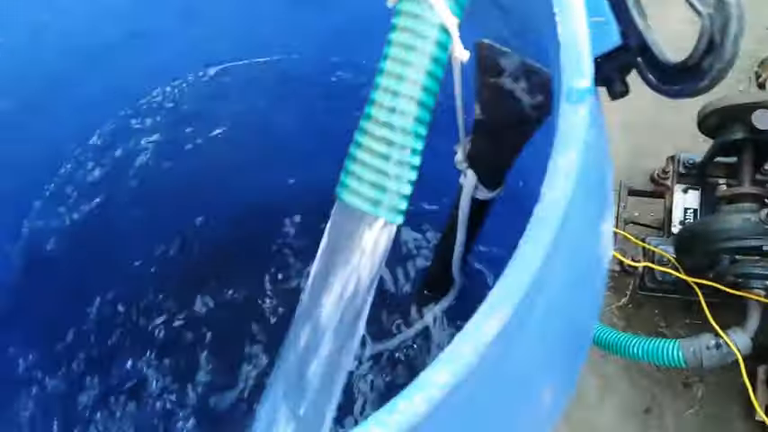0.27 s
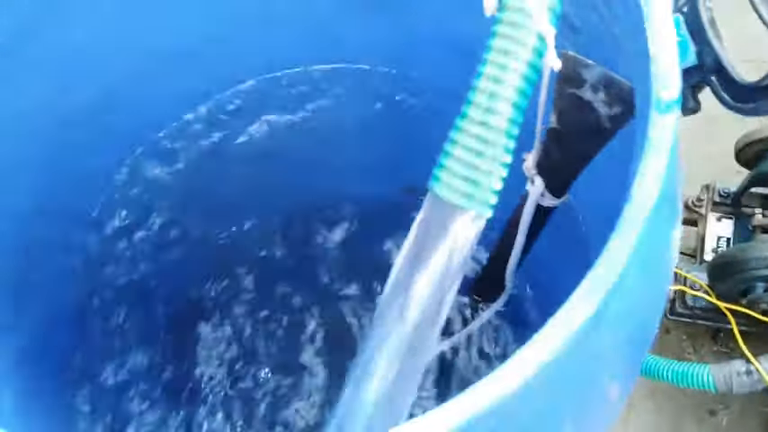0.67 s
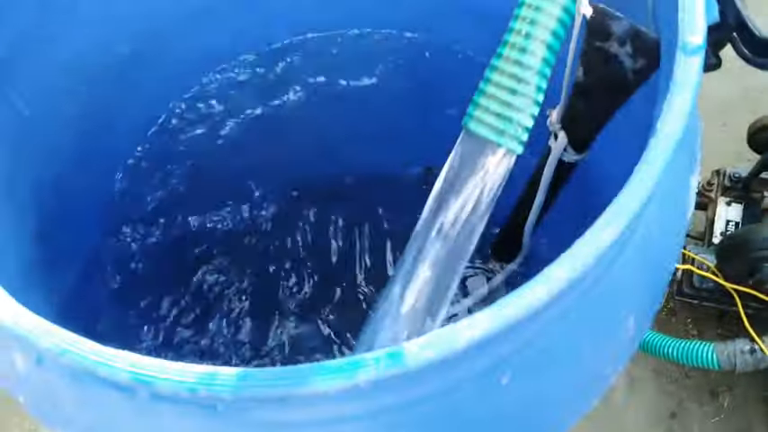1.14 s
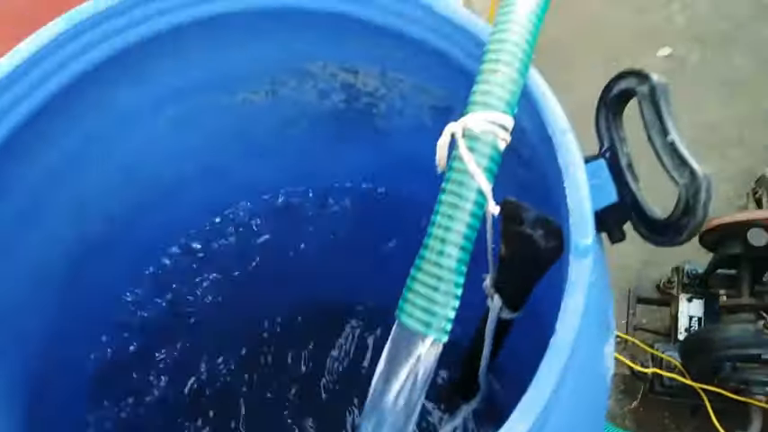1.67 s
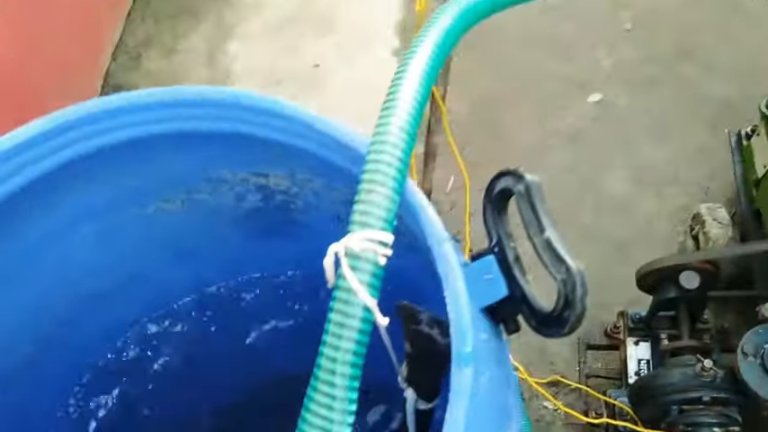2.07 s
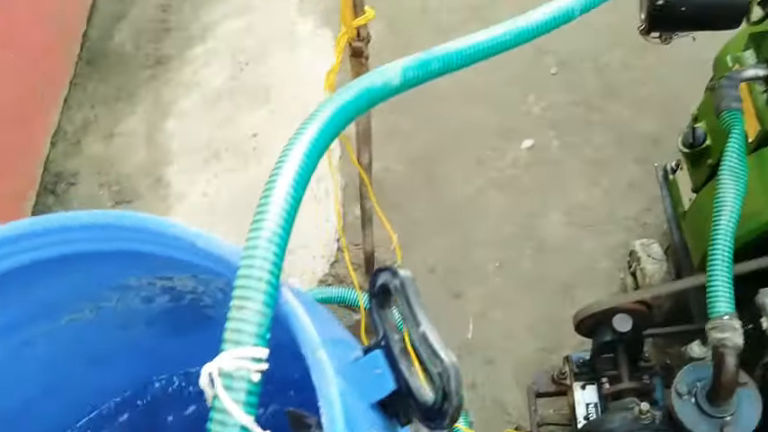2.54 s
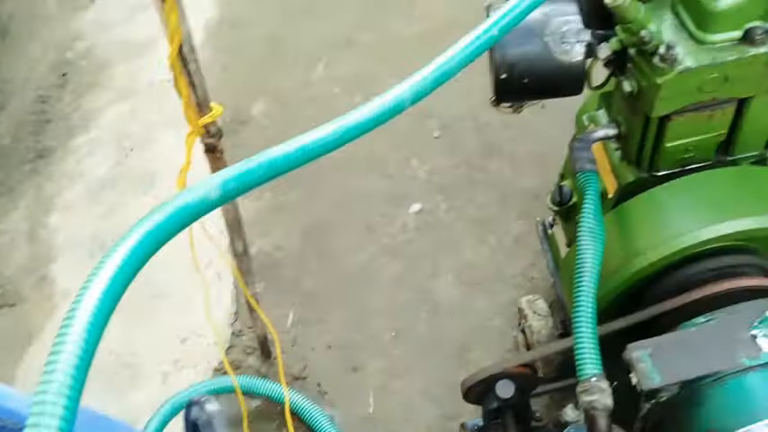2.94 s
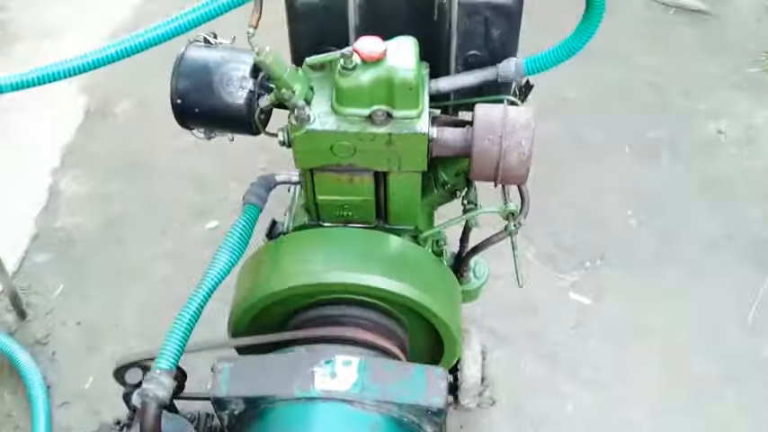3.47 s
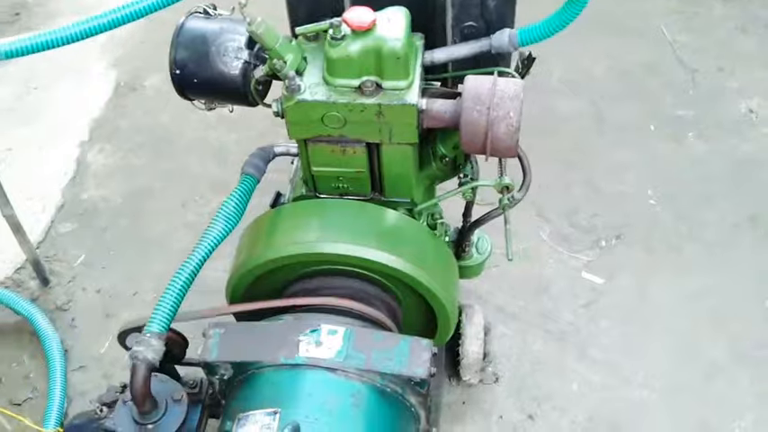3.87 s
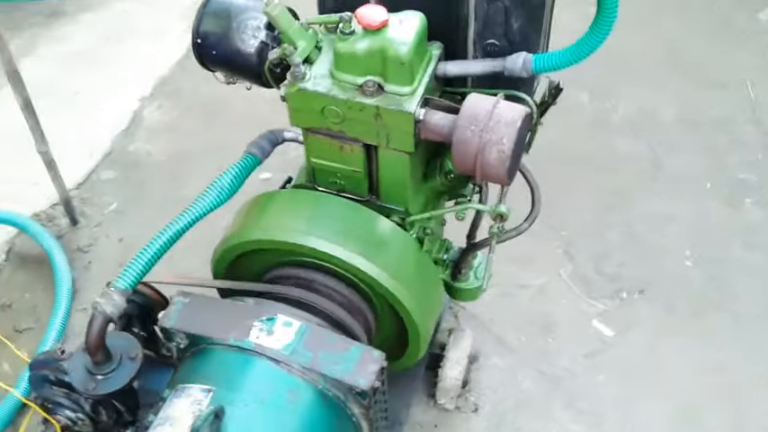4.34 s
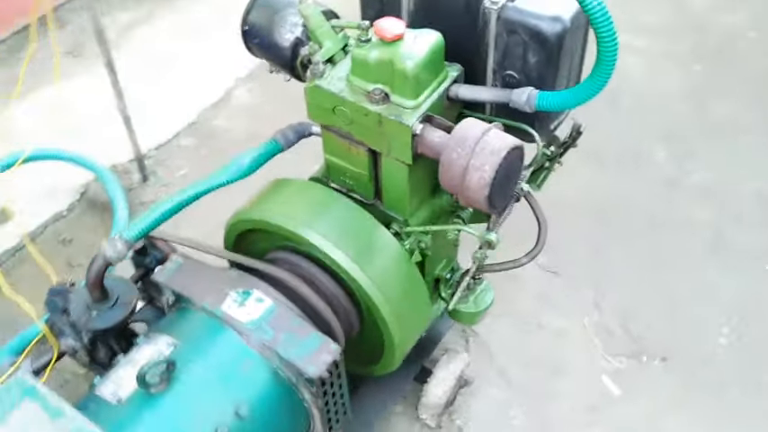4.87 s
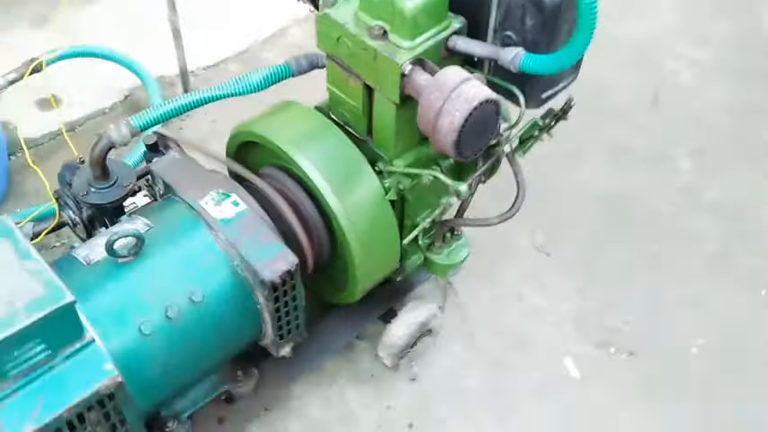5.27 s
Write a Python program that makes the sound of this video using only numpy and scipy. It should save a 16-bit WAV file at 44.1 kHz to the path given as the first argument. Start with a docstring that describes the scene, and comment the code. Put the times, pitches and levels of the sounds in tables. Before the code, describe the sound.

A single-cylinder diesel engine chugs fast and evenly with metallic clatter while water faintly splashes into a barrel, then the sound shifts to facing the engine.

```python
"""On a concrete floor, a single-cylinder four-stroke diesel drives an alternator and a pump, 13 firings a second.
Damped pulses make its exhaust and intake; filtered clicks and damped modes, swelling each cycle, make knock,
clatter, valve ticks and hiss; gear teeth strike at fixed crank angles over a faint rumble.
It is heard first over a barrel that a hose fills with splash and chirping bubbles, then away from it;
near 3.7 s the view jumps to facing the engine, the beat resuming out of step. The water returns at the end."""
import sys
import numpy as np
from scipy import signal
from scipy.fft import rfft, irfft
from scipy.io import wavfile
from scipy.ndimage import uniform_filter1d, minimum_filter1d

SR = 44100
rng = np.random.default_rng(int(sys.argv[2]) if len(sys.argv) > 2 else 0)


def master(y):
    """Save y as 16-bit WAV."""
    cut = np.clip(np.atleast_2d(y).T, -1, 1)
    pcm = np.round(cut * 32767)  # scale
    wavfile.write(sys.argv[1], SR, pcm.astype(np.int16))


N = 242990
TIME_S = np.arange(N) / SR
FIRING_HZ = 13.28  # until FACING_S
FACING_S = 3.695  # heard facing the engine from here
GAS_SCATTER_DB, BLOW_SCATTER_DB = 0.7, 1.6  # cycle-to-cycle standard deviations


def undb(db):
    """Decibels to gain."""
    return 10 ** (np.asarray(db) / 20)


def unit(x):
    """Scale to rms 1."""
    return x / np.sqrt(np.mean(x ** 2))


def curves(table):
    """Interpolate each column of a (time [s], ...) table at every sample."""
    times_s, *columns = np.transpose(table)
    return [np.interp(TIME_S, times_s, column) for column in columns]


def ramp(start_s, end_s):
    """Linear move from 0 to 1."""
    return np.clip((TIME_S - start_s) / max(end_s - start_s, 1 / SR), 0, 1)


def colour(x, spectrum):
    """Minimum-phase filter shaped by (frequency [Hz], relative level [dB]); rms 1."""
    points_hz, points_db = np.transpose(spectrum)
    size = 4096
    hz = np.maximum(np.arange(size // 2 + 1) * SR / size, 1)
    level_db = np.interp(np.log(hz), np.log(points_hz), points_db)
    cepstrum = irfft(np.log(undb(level_db)))
    # fold to the causal half
    cepstrum[1:size // 2] *= 2
    cepstrum[size // 2 + 1:] = 0
    response = irfft(np.exp(rfft(cepstrum)))
    return unit(signal.fftconvolve(x, response)[:N])


def ring(x, modes):
    """Damped modes (frequency [Hz], width [Hz], relative level [dB]) driven by x; rms 1."""
    t_s = TIME_S[:SR // 10]
    response = 0
    for hz, width_hz, db in modes:
        decay = np.exp(-np.pi * width_hz * t_s)
        response = response + undb(db) * np.sqrt(width_hz) * decay * np.cos(2 * np.pi * hz * t_s)
    return unit(signal.fftconvolve(x, response)[:N])


def clicks(times_s, sizes):
    """One impulse at each time."""
    at = np.round(np.ravel(times_s) * SR).astype(int)
    inside = (at >= 0) & (at < N)
    return np.bincount(at[inside], np.ravel(sizes)[inside], N)


def blows(times_s, shape, db, scatter_db):
    """One shape at each time, with scattered strength."""
    sizes = undb(db + scatter_db * rng.standard_normal(len(times_s)))
    return signal.fftconvolve(clicks(times_s, sizes), shape)[:N]


def swell(rise_s, decay_s):
    """Envelope: linear rise to 1, exponential decay."""
    t_s = TIME_S[:SR // 10]
    return np.minimum(t_s / rise_s, 1) * np.exp(-np.maximum(t_s - rise_s, 0) / decay_s)


def grit(per_s, spread_db):
    """Random dense clicks of uneven size and sign; rms 1."""
    chance = np.clip(per_s, 2000, SR) / SR
    struck = rng.random(N) < chance
    signs = rng.choice([-1, 1], N)
    sizes = undb(spread_db * np.clip(rng.standard_normal(N), -2, 2))
    return unit(struck * signs * sizes)


def waver(per_s, depth_db):
    """Gain wandering between random levels."""
    knots_s = np.arange(0, N / SR + 1, 1 / per_s)
    return undb(depth_db * np.interp(TIME_S, knots_s, rng.standard_normal(len(knots_s))))


DIP_START_S, DIP_FADE_S, DIP_RECOVERY_S, DIP_DB = 3.42, 0.084, 0.13, -4


def dip():
    """Level [dB] sinking briefly before the view jumps, then recovering."""
    fade = ramp(DIP_START_S, DIP_START_S + DIP_FADE_S)
    return DIP_DB * (fade - ramp(FACING_S, FACING_S + DIP_RECOVERY_S))


LEAVES_S, BESIDE_S, CIRCLED_S = 2.34, 3.1, 4.98
# radiation of each part, before the dip: (from the barrel [dB], beside the cylinder head [dB],
# facing the engine [dB], circled toward the silencer [dB])
PART_LEVELS = {"clatter": (-26.5, -25, -26, -25.5), "block": (-28, -26, -27, -31),
               "casing": (-24.5, -29.5, -24, -37.5), "cover": (-31, -27, -31.5, -36.5),
               "flywheel": (-33.5, -30, -27.5, -36), "knock": (-33.5, -34.4, -37, -34),
               "liner": (-41.5, -43, -45, -48), "hiss": (-42, -40.5, -44.5, -40),
               "springs": (-48.5, -49.5, -44.5, -44), "fizz": (-42, -45, -44, -42.5)}


def heard(part, facing):
    """Level [dB] of a part from barrel to cylinder head, then from facing toward the silencer."""
    barrel_db, beside_db, facing_db, circled_db = PART_LEVELS[part]
    walking_db = barrel_db + (beside_db - barrel_db) * ramp(LEAVES_S, BESIDE_S)
    circling_db = facing_db + (circled_db - facing_db) * ramp(FACING_S, CIRCLED_S)
    return (1 - facing) * walking_db + facing * circling_db + dip()


FIRST_STROKE_S, BEAT_SHIFT_S, LATER_FIRING_HZ = 0.0159, 0.0162, 13.289
EARLY_S, SETTLE_S, JITTER_S = 0.0014, 0.45, 0.0001


def exhaust_strokes():
    """Stroke times [s]: the governor settles, the beat shifts once near 3.7 s, cycles stray about 0.1 ms."""
    even_s = FIRST_STROKE_S + np.arange(-1, N / SR * FIRING_HZ + 1) / FIRING_HZ
    before_s = even_s - EARLY_S * np.exp(-even_s / SETTLE_S)
    after_s = FACING_S + BEAT_SHIFT_S + (even_s - FACING_S) * FIRING_HZ / LATER_FIRING_HZ
    strokes_s = np.where(even_s < FACING_S, before_s, after_s)
    return strokes_s + JITTER_S * rng.standard_normal(len(even_s))


# pipe and silencer pulses: (delay after exhaust stroke [s], ring [Hz], decay [s],
# relative level from the barrel [dB], relative level facing the engine [dB])
GAS_PULSES = [(-.0006, 120, 0.0072, -31, -24.5), (0, 117.5, 0.0098, -48, -30.5),
              (-.0006, 82, 0.015, -33.5, -42), (0, 376, 0.0021, -22.5, -22.5), (0, 890, 0.00054, -15, -18),
              (.011, 102, 0.0055, -34, -50), (0.0214, 347, 0.0073, -22, -29.5),
              (0.0217, 900, 0.00031, -27, -32), (0.0198, 162, 0.01, -36.5, -42),
              (.0252, 403, 0.0041, -48, -21.5), (0.0263, 432, 0.0079, -27, -42),
              (0.0429, 400, 0.0022, -37, -32)]


def gas_pulses(strokes_s):
    """Exhaust and intake each release a pressure step that rings pipe and silencer."""
    t_s, out = TIME_S[:SR // 10], 0
    onset = (1 - np.exp(-t_s / 0.00008)) ** 2
    for delay_s, hz, decay_s, barrel_db, facing_db in GAS_PULSES:
        shape = np.exp(-t_s / decay_s) * np.cos(2 * np.pi * hz * t_s) * onset
        db = np.where(strokes_s < FACING_S, barrel_db, facing_db)
        out = out + blows(strokes_s + delay_s, shape, db, GAS_SCATTER_DB)
    return out


# knock spectrum: (frequency [Hz], relative level [dB])
KNOCK_SPECTRUM = [(500, -34), (1000, 1), (1500, 9.5), (2000, 0.5), (2350, 0), (2620, 2), (3000, -18),
                  (4000, -16), (7000, -44)]
# cylinder liner modes: (frequency [Hz], width [Hz], relative level [dB])
LINER_MODES = [(2114, 13, 2), (2145, 30, -9), (2637, 82, 1), (2696, 62, 2), (3005, 30, -1),
               (3270, 21, -10.5), (3620, 27, -15.5)]
KNOCK_LEAD_S, KNOCK_RISE_S, KNOCK_DECAY_S = 0.0174, 0.0045, 0.0088  # lead on the exhaust stroke


def knock(strokes_s, facing):
    """Combustion cracks before the exhaust and piston slap around it, ringing the cylinder liner."""
    burst = blows(strokes_s - KNOCK_LEAD_S, swell(KNOCK_RISE_S, KNOCK_DECAY_S), 0, BLOW_SCATTER_DB)
    slap = blows(strokes_s - 0.002, swell(0.0049, 0.0087), -12.0, BLOW_SCATTER_DB)
    force = unit(burst + slap * undb(7.7 * facing))
    crack = force * colour(grit(per_s=6000, spread_db=2.5), KNOCK_SPECTRUM)
    liner = ring(force * grit(per_s=3000, spread_db=8.5), LINER_MODES)
    return undb(heard("knock", facing)) * crack + undb(heard("liner", facing)) * liner


# clatter spectra from the barrel and facing the engine: (frequency [Hz], relative level [dB])
BARREL_SPECTRUM = [(110, -1.5), (200, -16), (330, -0.5), (500, -5.5), (750, -1.5), (1050, -0.5), (1220, -3),
                   (1520, 1.5), (1900, -5), (2500, -9.5), (3300, -21.5), (5000, -48)]
FACING_SPECTRUM = [(110, 6.5), (200, -8.5), (330, 2.5), (500, -2), (750, 3.5), (1050, 1.5), (1220, 4.5),
                   (1520, 0), (1900, -8), (2500, -11), (3900, -15.5), (5200, -19), (7500, -37)]
# modes of block, casing, cover and flywheel: (frequency [Hz], width [Hz], relative level [dB])
BLOCK_MODES = [(616.2, 23, 7), (1413, 11, 0)]
CASING_MODES = [(686, 14, 0), (714, 24, -9)]
COVER_MODES = [(1666, 32, 0)]
FLYWHEEL_MODES = [(963.7, 15, -3.5), (912, 62, -1.5)]


def machinery(strokes_s, facing):
    """Loose parts rattle and ring the iron, hardest after combustion and at valve changeover."""
    combustion = blows(strokes_s - 0.017, swell(0.013, 0.0056), -0.5, BLOW_SCATTER_DB)
    changeover = blows(strokes_s + 0.0199, swell(0.0023, 0.002), 2.3, BLOW_SCATTER_DB)
    load = 1.5 + combustion + changeover
    rattle = load * grit(per_s=3000, spread_db=0.5)
    clatter = (1 - facing) * colour(rattle, BARREL_SPECTRUM) + facing * colour(rattle, FACING_SPECTRUM)
    out = undb(heard("clatter", facing)) * clatter
    ringing_parts = (("block", BLOCK_MODES), ("casing", CASING_MODES),
                     ("cover", COVER_MODES), ("flywheel", FLYWHEEL_MODES))
    for part, modes in ringing_parts:
        out = out + undb(heard(part, facing)) * ring(load * grit(per_s=2500, spread_db=0.5), modes)
    return out


# gear spectrum: (frequency [Hz], relative level [dB])
GEAR_SPECTRUM = [(140, 1.5), (220, -15.5), (330, -5), (460, -2.5), (600, -7.5), (900, -6), (1600, -8.5),
                 (2200, -14.5), (4000, -47.5)]


def gears(strokes_s, facing, count=160):
    """Gear teeth and linkages strike at the same crank angles every cycle."""
    offsets_s = (np.arange(count) + rng.random(count)) / count / FIRING_HZ
    strengths = rng.standard_normal(count)
    scatter = undb(BLOW_SCATTER_DB * rng.standard_normal((len(strokes_s), count)))
    strikes = clicks(strokes_s[:, None] + offsets_s, strengths * scatter)
    return undb(-30.5 + facing * 1.5) * colour(strikes, GEAR_SPECTRUM)


# gas spits and valve ticks: (delay after exhaust stroke [s], rise [s], decay [s],
# relative level from the barrel [dB], relative level facing the engine [dB])
TICK_SWELLS = [(.0012, 0.0022, 0.0044, 6, 12), (0.0186, 0.0011, 0.0052, 5, -3),
               (0.0436, .0006, 0.003, -2, -16)]
# gas, hiss and fizz spectra, including the microphone's peaks near 6 and 15 kHz:
# (frequency [Hz], relative level [dB])
GAS_SPECTRUM = [(2000, -33), (4000, -6), (5000, 1.5), (6200, 10.5), (7500, -5.5), (9000, 1), (11000, -6),
                (13000, 1), (14500, 17.5), (15500, -9)]
HISS_SPECTRUM = [(1500, 4), (3000, -9), (3900, -6), (4800, -11), (5500, -3), (6350, 7), (6800, 3),
                 (7400, -8), (7800, -4.5), (9000, -50), (11000, -22), (13000, -10), (15500, -5.5)]
FIZZ_SPECTRUM = [(6000, -38), (11500, -15), (13000, -3), (13700, -9), (14600, 3), (15400, 13), (16000, -24)]
# valve spring modes: (frequency [Hz], width [Hz], relative level [dB])
SPRING_MODES = [(4240, 23, -6), (4330, 40, 4), (5380, 41, 3), (6000, 300, 10.5), (6430, 130, 2),
                (7770, 50, 0)]


def hiss(strokes_s, facing):
    """Belt and bearings sizzle; gas spits out, and the valves tick and ring their springs each cycle."""
    spits = 0
    for delay_s, rise_s, decay_s, barrel_db, facing_db in TICK_SWELLS:
        db = np.where(strokes_s < FACING_S, barrel_db, facing_db)
        spits = spits + blows(strokes_s + delay_s, swell(rise_s, decay_s), db, BLOW_SCATTER_DB)
    load = unit(1 + blows(strokes_s - 0.016, swell(0.003, 0.02), -9, BLOW_SCATTER_DB))
    # the same tiny contacts make hiss and fizz
    contacts = load * grit(per_s=5000, spread_db=4.5)
    gas = spits * colour(grit(per_s=25000, spread_db=1.5), GAS_SPECTRUM)
    springs = ring((load + spits) * grit(per_s=3200, spread_db=1), SPRING_MODES)
    sizzle = gas + undb(-2.0) * colour(contacts, HISS_SPECTRUM)
    fizz = colour(contacts, FIZZ_SPECTRUM)
    out = undb(heard("hiss", facing)) * sizzle
    out = out + undb(heard("springs", facing)) * springs
    return out + undb(heard("fizz", facing)) * fizz


# frame rumble spectrum: (frequency [Hz], relative level [dB])
RUMBLE_SPECTRUM = [(20, -3), (40, -13), (80, 4), (160, 5), (260, -2), (500, -23)]
SHAKE_DB, RUMBLE_DB, FACING_RISE_DB = -52.5, -50, 3.5  # before the dip; the rise lifts both


def rumble(strokes_s, facing):
    """The crank shakes the frame once a turn, twice a cycle, over a faint random rumble."""
    cycles = np.interp(TIME_S, strokes_s, np.arange(len(strokes_s)))
    floor = colour(rng.standard_normal(N), RUMBLE_SPECTRUM)
    shake = np.sin(2 * np.pi * 2 * cycles)
    return undb(FACING_RISE_DB * facing) * (undb(SHAKE_DB) * shake + undb(RUMBLE_DB) * floor)


# stream into the barrel: (time [s], level [dB])
WATER_LEVEL = [(0, -47), (1.5, -42), (2.6, -38), (3.4, -69), (3.7, -69), (5.5, -45)]
# stream striking the surface: (frequency [Hz], relative level [dB])
SPLASH_SPECTRUM = [(800, -21), (2500, 2), (3600, -4), (5000, -25), (7000, -11), (10000, -34)]


def water(count=700):
    """The stream splashes and drives bubbles under; each rings briefly and rises in pitch."""
    bubbles = np.zeros(N + SR)
    for when, pitch, size in rng.random((count, 3)):
        start_hz = 700 * 8 ** pitch
        cycles = np.arange(int(40 * SR / start_hz)) * start_hz / SR
        chirp = np.exp(-cycles / 7) * np.sin(2 * np.pi * cycles * (1 + 0.0031 * cycles))
        start = int(when * N)
        bubbles[start:start + len(cycles)] += undb(10 * size ** 3 - 9 * pitch) * chirp
    splash = colour(grit(per_s=2800, spread_db=8), SPLASH_SPECTRUM)
    return (unit(bubbles[:N]) + undb(-2.5) * splash) * undb(curves(WATER_LEVEL)[0])


def scene():
    """Engine and water, heard first from the barrel and then facing the cylinder."""
    facing = np.clip((TIME_S - FACING_S) * 100, 0, 1)  # 10 ms crossfade
    strokes_s = exhaust_strokes()
    # the thump grows on the way round to the silencer
    approach_db = np.interp(TIME_S, [FACING_S, N / SR], [-0.5, 2])
    beat = undb(dip()) * (undb(approach_db) * gas_pulses(strokes_s) + rumble(strokes_s, facing))
    metal = gears(strokes_s, facing) + machinery(strokes_s, facing)
    # small iron parts radiate little bass
    metal = signal.sosfilt(signal.butter(4, 210, "high", fs=SR, output="sos"), metal)
    treble = knock(strokes_s, facing) + hiss(strokes_s, facing)
    return (beat + metal + treble * waver(per_s=8, depth_db=1.54) + water())[None]


TOP_HZ, LIMIT_DB = 15560, -9.6  # limit re full scale, ahead of the low-pass


def record(dry):
    """A limiter with smoothed gain holds the peaks down; a steep low-pass cuts the top."""
    allowed = np.minimum(1, undb(LIMIT_DB) / (np.abs(dry) + 1e-9))
    gain = uniform_filter1d(minimum_filter1d(allowed, size=300), size=300)
    low_pass = signal.ellip(12, 0.2, 80, TOP_HZ, fs=SR, output="sos")
    return signal.sosfilt(low_pass, dry * gain)


dry = scene()
out = record(dry)
master(out)
```